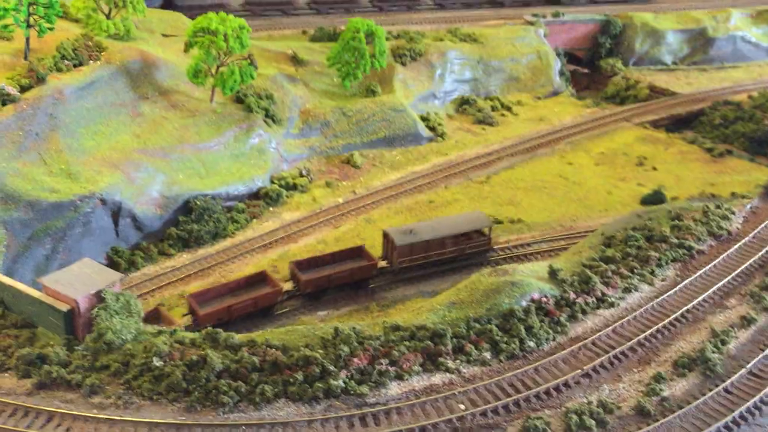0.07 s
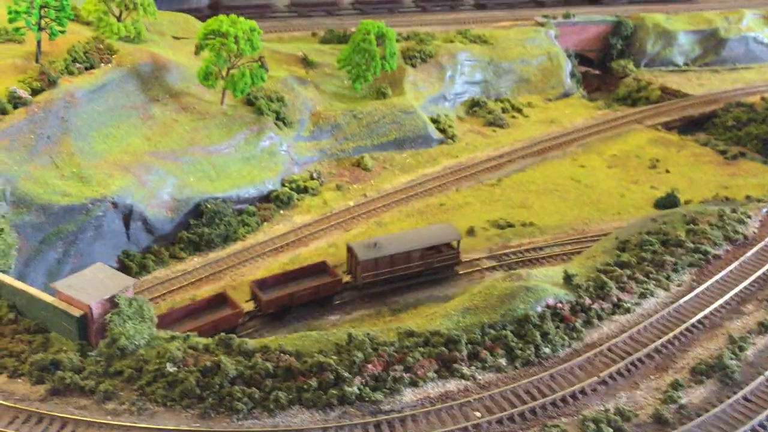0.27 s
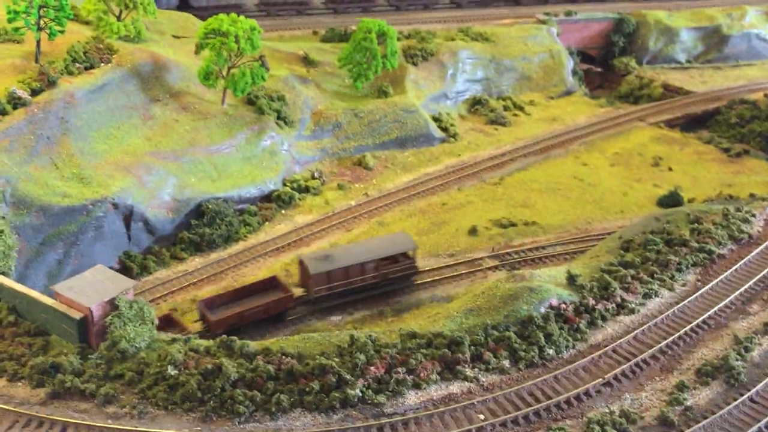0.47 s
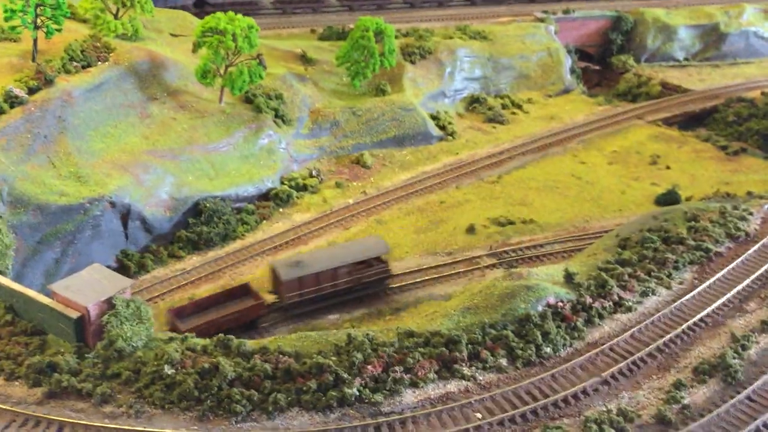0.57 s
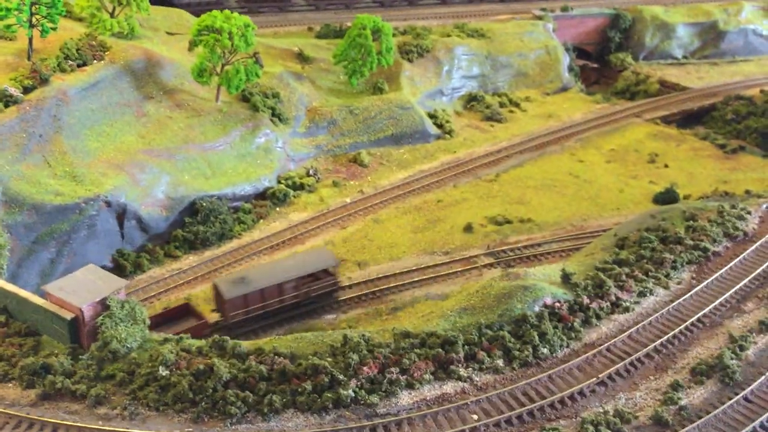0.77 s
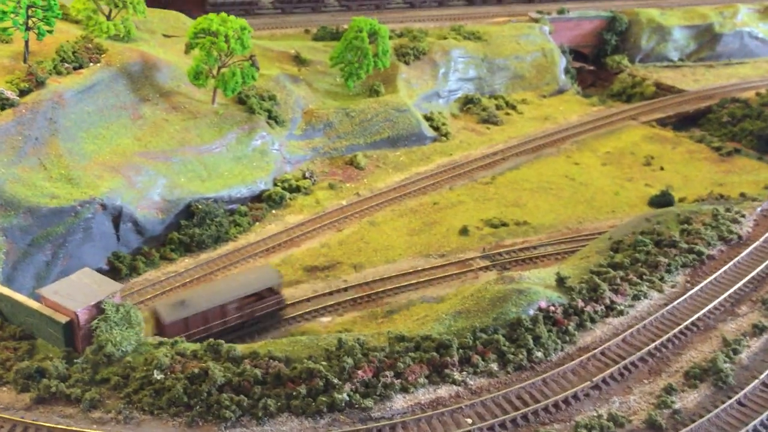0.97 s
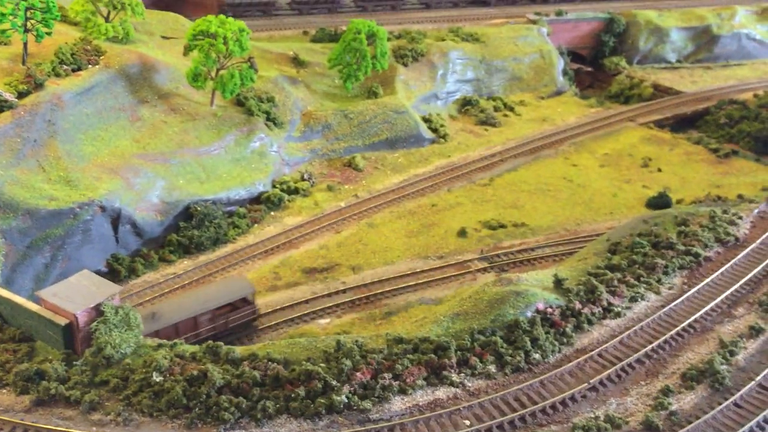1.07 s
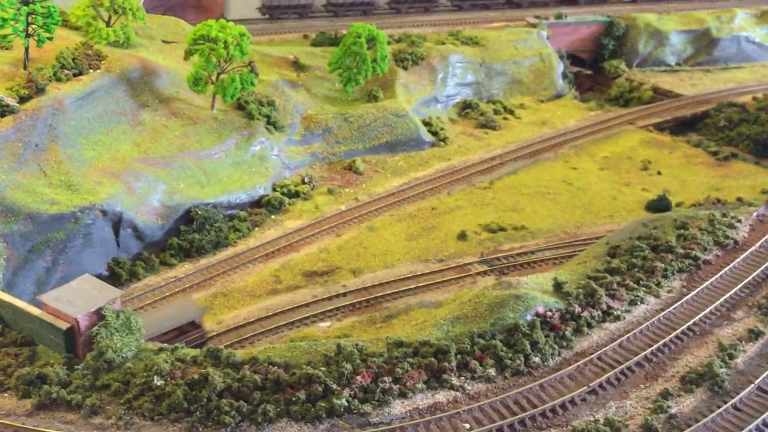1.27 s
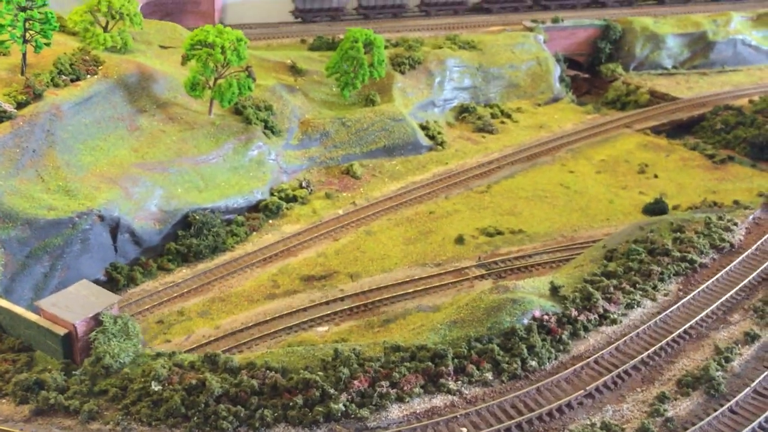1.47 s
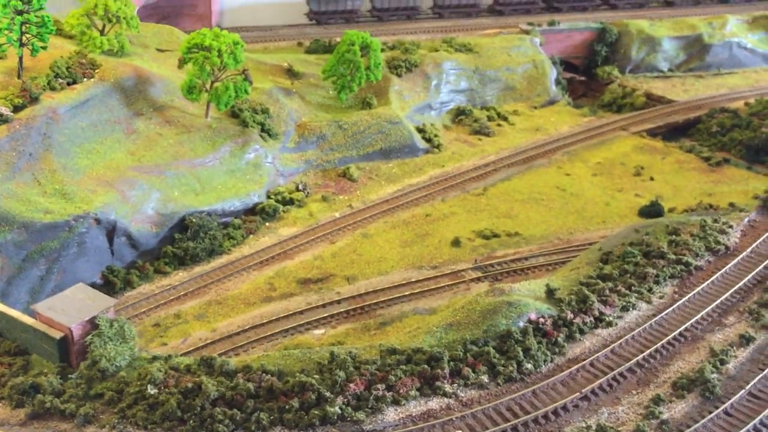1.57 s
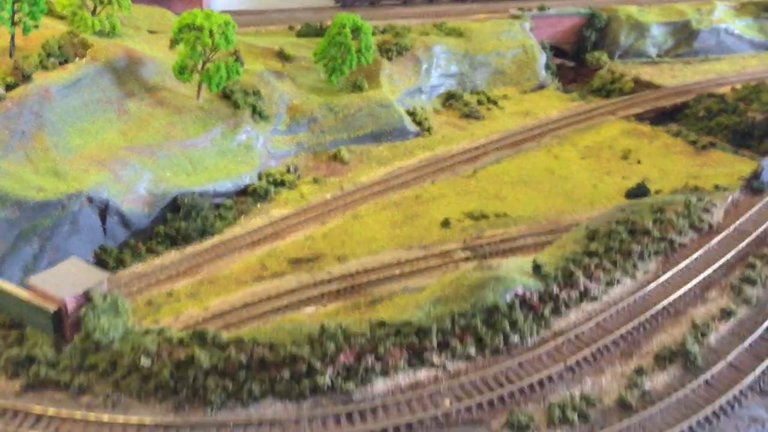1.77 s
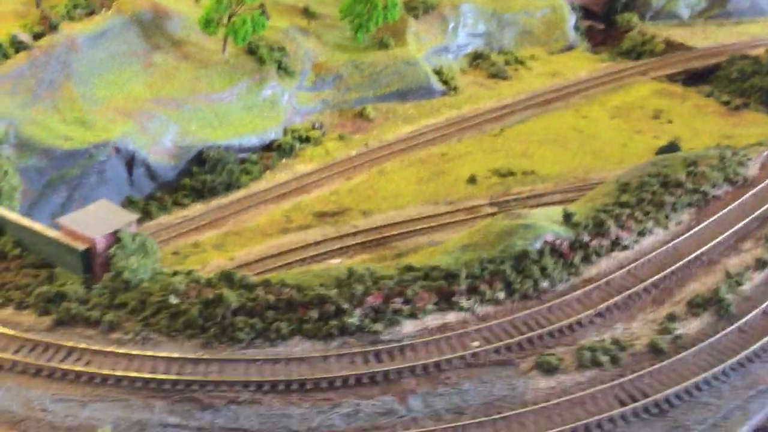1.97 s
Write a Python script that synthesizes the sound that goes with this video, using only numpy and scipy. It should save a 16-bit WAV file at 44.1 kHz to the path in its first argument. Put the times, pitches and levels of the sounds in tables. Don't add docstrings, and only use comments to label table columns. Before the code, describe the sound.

Model train wheels run on metal rails over a hollow board, heard closely in a small room. Joints crack, points scrape, wagons knock and low thumps bloom below, as a thin rattle fades into a deeper one.

```python
import sys
import numpy as np
from scipy import signal
from scipy.fft import rfft, irfft, next_fast_len
from scipy.io import wavfile
from scipy.ndimage import uniform_filter1d, map_coordinates

SR = 44100
rng = np.random.default_rng(int(sys.argv[2]) if len(sys.argv) > 2 else 0)


def how_loud(loudness_db):
    steps = np.asarray(loudness_db, float) / 20
    return 10 ** steps


def file_out(sig):
    cols = np.atleast_2d(sig).T
    lim = np.clip(cols, -1, 1)
    pcm = np.round(lim * 32767).astype(np.int16)
    wavfile.write(sys.argv[1], SR, pcm)


N = 88993


def unit(x):
    return x / np.sqrt(np.mean(x ** 2) + 1e-20)


def along(points, hz):
    f, v = np.transpose(points)
    return np.interp(np.log(hz + 1), np.log(f + 1), v)


def curves(rows):
    s, *columns = np.transpose(rows)
    return [np.interp(np.arange(N) / SR, s, column) for column in columns]


def wobble(rate):
    return map_coordinates(rng.standard_normal(4000), [np.arange(N) * rate / SR])


def filtered(x, response):
    m = next_fast_len(len(x) + 8192)
    return irfft(rfft(x, m) * response(np.fft.rfftfreq(m, 1 / SR)), m)[:len(x)]


def contacts(per_s, scatter_db):
    when, size, sign = rng.random((3, N))
    heights = how_loud(-scatter_db * np.log(size + .03))
    return unit((when < per_s / SR) * heights * np.sign(sign - .5))


def patchy(x, depth_db):
    z = signal.stft(x, nperseg=512)[2]
    field = uniform_filter1d(rng.standard_normal(z.shape), size=5, axis=0)
    field = uniform_filter1d(field, size=8, axis=1)
    return signal.istft(z * how_loud(depth_db * unit(field)), nperseg=512)[1][:N]


def surface(x, depth_db, spectrum):
    return unit(filtered(patchy(x, depth_db), lambda hz: how_loud(along(spectrum, hz))))


def clack(t, bright_db, body_db):
    body, bright = body_db + 9.5, bright_db + 6.5
    colour = [(1200, -30), (3000, body + 2.5), (4500, body), (6500, 0.2), (9500, -7),
              (12500, bright), (16000, bright - 4)]
    return unit(filtered(rng.standard_normal(len(t)), lambda hz: how_loud(along(colour, hz))))


def uneven_db(t):
    steps = np.clip(3 * rng.standard_normal(len(t) // 64 + 1), -6, 6)
    return steps.repeat(64)[:len(t)]


# pitch in Hz, rms level in dB.
STEADY_LINES = [(1157, -54), (1356, -51), (1451, -58.5), (1515, -56), (3919, -60)]


def steady_tones():
    t = np.arange(N) / SR
    out = np.zeros(N)
    for hz, db in STEADY_LINES:
        level = np.sqrt(2) * how_loud(db + 4.3 * wobble(9.38))
        blur = np.cumsum(5.7 * wobble(30)) / SR
        out += level * np.sin(2 * np.pi * (hz * t + blur))
    return out


# centre in seconds, level in dB, pitch in Hz, length in seconds, glide in Hz per second.
BOARD_BOOMS = [(.22, -36, 119.4, 0.021, -30), (.51, -42, 124, 0.02, -40), (.605, -45, 128, 0.018, 5),
               (.69, -47.5, 134, 0.025, 5), (.785, -39, 119.5, 0.02, 20), (.8, -42.5, 151, 0.036, 5),
               (.872, -41.5, 132, 0.023, 5), (1.005, -38.5, 120, 0.019, 40), (.99, -46, 304, 0.048, 500),
               (1.0, -45, 214.5, 0.042, -40), (1.175, -37, 122.5, .035, 5), (1.285, -43.5, 119.7, 0.024, 5),
               (1.405, -39, 122, 0.016, -60), (1.42, -46, 302, 0.012, 5), (1.585, -38, 127, 0.046, 150),
               (1.73, -41.5, 121, 0.048, 30), (2.0, -45, 125, 0.018, 5)]


def board():
    out = np.zeros(N)
    for s, db, hz, length, glide in BOARD_BOOMS:
        t = np.arange(N) / SR - s
        swell = np.exp(-.5 * (t / length) ** 2)
        cycles = hz * t + glide * t ** 2 / 2 + rng.random()
        out += np.sqrt(2) * how_loud(db) * swell * np.sin(2 * np.pi * cycles)
    return out


# frequency in Hz, level in dB per Hz.
RUMBLE_SPECTRUM = [(15, -60), (30, -30), (70, -10), (110, -4), (160, -2.5), (340, -4.5), (515, -11.5),
                   (700, -6.5), (900, -22.5), (1800, -82)]


def rumble():
    return surface(rng.standard_normal(N), 1.5, RUMBLE_SPECTRUM) * how_loud(-41.5 + .5 * wobble(8))


# frequency in Hz, level in dB per Hz.
FIZZ_SPECTRUM = [(3000, 2.5), (6000, 7.5), (9500, -3.5), (12000, -2), (15600, -4)]


def fizz():
    grit = contacts(per_s=1200, scatter_db=5) + 0.91 * rng.standard_normal(N)
    return surface(grit, 1.2, FIZZ_SPECTRUM) * how_loud(-55 + 1.2 * wobble(30))


# frequency in Hz, level in dB per Hz.
ROLL_SPECTRUM = [(500, -30), (850, -7.5), (1330, -3), (1750, -2.5), (2260, -4), (2780, -5.5), (3930, -10),
                 (9000, -30), (11700, -34), (19800, -120)]


def roar():
    level_db = -32.5 - 1.65 * np.arange(N) / SR
    return surface(rng.standard_normal(N), .8, ROLL_SPECTRUM) * how_loud(level_db) * how_loud(0.3 * wobble(20))


def pings():
    per_s, hz, t60 = 22, 12200, .012
    when, size = rng.random((2, N))
    t = np.arange(SR // 40) / SR
    ring = how_loud(-60 * t / t60) * (1 - np.exp(-t / 0.00053)) * np.sin(2 * np.pi * hz * t)
    hits = (when < per_s / SR) * how_loud(13 * (size - 1.0))
    return how_loud(-46) * signal.fftconvolve(hits, ring)[:N]


# peak time in seconds, peak level in dB, brightness in dB, body in dB.
BLADE_SCRAPES = [(0.593, -37, -20, -5), (0.765, -32.5, -14, -5), (0.8848, -30.5, -12, 2),
                 (0.9397, -33.5, -16, 0), (1.17, -34.5, -17, -8), (1.3338, -32, -21, -1.5),
                 (1.4053, -38, -23, -5), (1.4717, -34, -20, 4), (1.702, -32.5, -31, -1),
                 (1.9106, -29, -20, -4), (1.9677, -38.5, -19.5, -16)]


def scrapes():
    out, t = np.zeros(N + SR), np.arange(SR // 8) / SR
    rise_s = 0.0061
    u = t / rise_s
    for s, db, bright_db, body_db in BLADE_SCRAPES:
        level = how_loud(db - 7 + uneven_db(t))
        scrape = level * clack(t, bright_db - 1.5, body_db) * u * np.exp(1 - u)
        out[round((s - rise_s) * SR):][:len(t)] += scrape
    return out[:N]


# start in seconds, peak level in dB, brightness in dB, body in dB.
RAIL_JOINTS = [(0.1378, -27.5, -16, 0), (0.1886, -26.5, -28, -4), (0.2474, -31, -16, 9),
               (0.2686, -28, -17, -0.5), (0.3585, -32, -24, 1), (0.3764, -39, -22, -14),
               (0.407, -40, -19, -4), (0.4257, -27.5, -18, -1.5), (0.4868, -38, -7, -1),
               (0.703, -38, -17, -3), (0.7955, -25, -17, 0.5), (1.001, -36, -27.5, -2),
               (1.0544, -40, -11, -12), (1.0763, -41, -21, -3), (1.285, -31.5, -14, 2),
               (1.4589, -34.5, -13, -8), (1.5571, -39.5, -16, -12), (1.6294, -43, -20, 15),
               (1.6811, -32, -14, -9)]


def joints():
    out, t = np.zeros(N + SR), np.arange(SR // 8) / SR
    tick_t60, rattle_t60 = 0.016, 0.15
    for s, db, bright_db, body_db in RAIL_JOINTS:
        shape = how_loud(-60 * t / tick_t60) + how_loud(-9 - 60 * t / rattle_t60 + uneven_db(t))
        onset = 1 - np.exp(-t / 0.00028)
        out[round(s * SR):][:len(t)] += how_loud(db - 2.5) * clack(t, bright_db, body_db) * shape * onset
    return out[:N]


# start in seconds, peak level in dB, loudest note in Hz.
COUPLINGS = [(.1885, -24, 2340), (.4622, -18, 2150), (.5327, -20, 2075), (.5719, -21, 2110),
             (.657, -22, 2080), (.7023, -23, 2100), (.7986, -22, 2270), (.8375, -24, 2280),
             (.9283, -23, 2200), (.9415, -20, 2370), (1.1633, -23, 2300), (1.2146, -23, 2190),
             (1.283, -22, 2190), (1.4705, -19, 3100)]
# pitch in Hz, level in dB, decay time T60 in seconds.
KNOCK_NOTES = [(1400, -14, 0.028), (2150, -3, 0.047), (2710, -7, 0.035), (3370, -5, 0.016)]


def knocks():
    out, t = np.zeros(N + SR), np.arange(SR // 8) / SR
    for s, db, note_hz in COUPLINGS:
        ring = np.zeros(len(t))
        for hz, note_db, t60 in [*KNOCK_NOTES, (note_hz, 0, 0.029)]:
            decay = how_loud(note_db + rng.normal(0, 4.7) - 60 * t / t60)
            ring += decay * np.sin(2 * np.pi * hz * (1 + rng.normal(0, 0.038)) * t)
        out[round(s * SR):][:len(t)] += how_loud(db - 7.5) * ring * (1 - np.exp(-t / 0.0011))
    return out[:N]


def geared_body(rows, width_hz, gain_db):
    level_db, hz = curves(rows)
    pole = np.exp(-np.pi * width_hz / SR)
    teeth = contacts(per_s=1500, scatter_db=3) * np.exp(2j * np.pi * rng.random(N))
    softened = signal.lfilter([1], [1, -pole ** 3], teeth)
    ring = signal.lfilter([1], [1, -pole], softened)
    tone = np.real(ring * np.exp(2j * np.pi * np.cumsum(hz) / SR))
    return unit(tone) * how_loud(level_db + gain_db + 0.4 * wobble(22))


# time in seconds, level in dB, resonance in Hz.
CHASSIS_PATH = [
    (.1, -43, 1400),
    (.5, -50, 1428),
    (.95, -40, 1429),
    (1.2, -36, 1334),
    (1.35, -37.5, 1360),
    (1.55, -35, 1351),
    (1.7, -31.5, 1330),
    (1.9, -34.5, 1342),
    (2.0, -35, 1395),
]


def chassis():
    return geared_body(CHASSIS_PATH, width_hz=247, gain_db=-2.5)


# time in seconds, level in dB, resonance in Hz.
SHELL_PATH = [
    (.1, -37.5, 2500),
    (.27, -36, 2420),
    (.33, -37, 2150),
    (.55, -35, 2120),
    (.75, -32.5, 2150),
    (.85, -29.5, 2250),
    (1.05, -33, 2220),
    (1.35, -36, 2230),
    (1.65, -39, 2240),
    (2.0, -40, 2270),
]


def shell():
    return geared_body(SHELL_PATH, width_hz=225, gain_db=-3.5)


def room(x):
    t = np.arange(SR // 3) / SR
    tail = rng.standard_normal(len(t)) * how_loud(-60 * t / 0.52)
    tail = filtered(tail, lambda hz: 1 / (1 + hz / 6000))
    delayed = np.pad(tail, (200, 0)) / np.linalg.norm(tail)
    return x + how_loud(-12) * signal.fftconvolve(x, delayed)[:N]


def scene():
    train = shell() + chassis() + joints() + scrapes() + knocks() + pings()
    rolling = roar() + rumble() + fizz()
    return (room(train) + rolling + board() + steady_tones())[None]


def top_cut(x):
    return signal.sosfilt(signal.butter(12, 15710, fs=SR, output="sos"), x)


def record(dry):
    dip_hz, dip_width_hz, dip_db, low_cut_hz, open_s = 10400, 440, -5.5, 15, .0842

    def capsule(hz):
        dip = how_loud(dip_db * np.exp(-((hz - dip_hz) / dip_width_hz) ** 2))
        return dip * hz ** 2 / (hz ** 2 + low_cut_hz ** 2)

    is_open = np.arange(N) >= open_s * SR
    mix = filtered(dry[0], capsule)[None] * is_open
    return top_cut(mix)


dry = scene()
out = record(dry)
file_out(out)
```